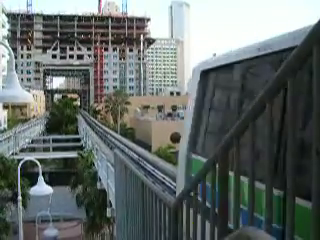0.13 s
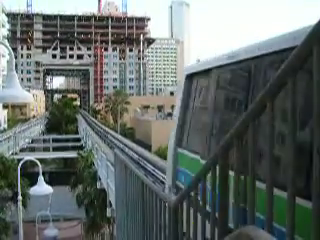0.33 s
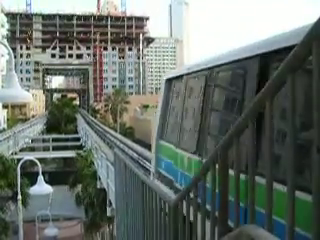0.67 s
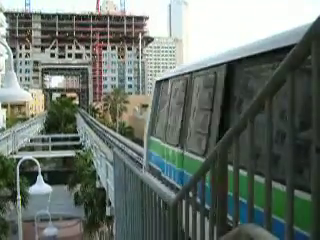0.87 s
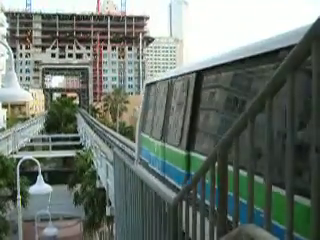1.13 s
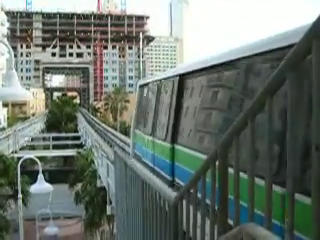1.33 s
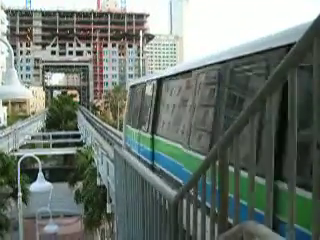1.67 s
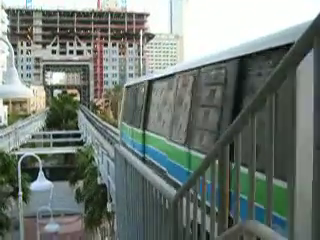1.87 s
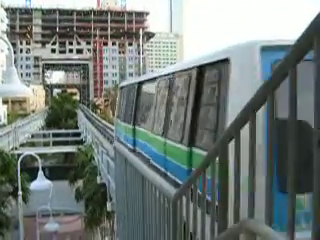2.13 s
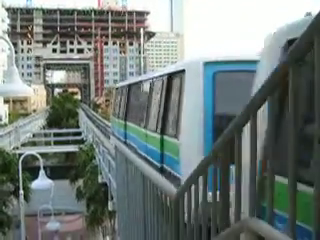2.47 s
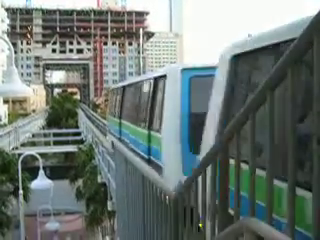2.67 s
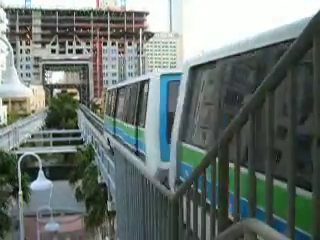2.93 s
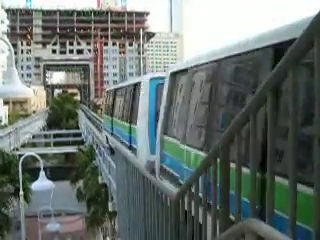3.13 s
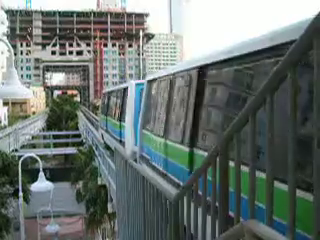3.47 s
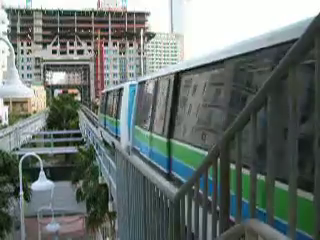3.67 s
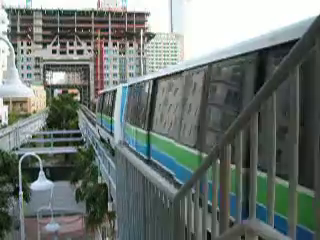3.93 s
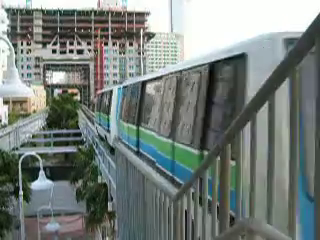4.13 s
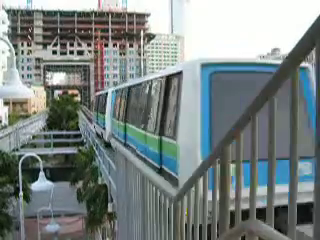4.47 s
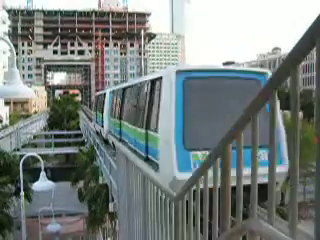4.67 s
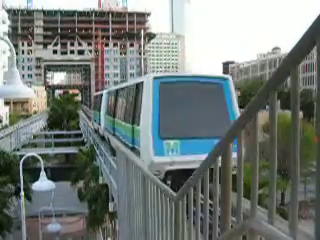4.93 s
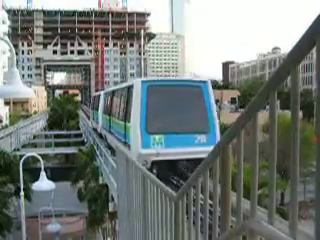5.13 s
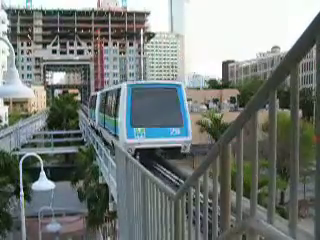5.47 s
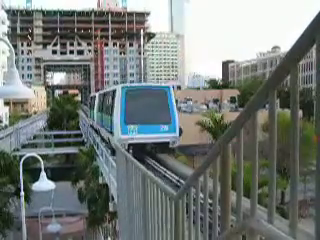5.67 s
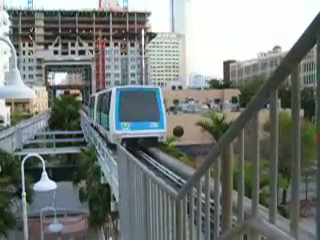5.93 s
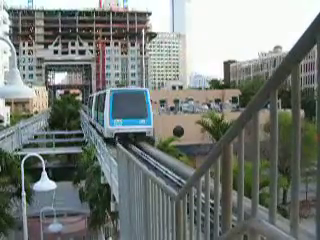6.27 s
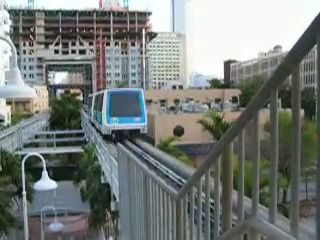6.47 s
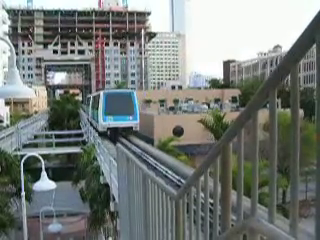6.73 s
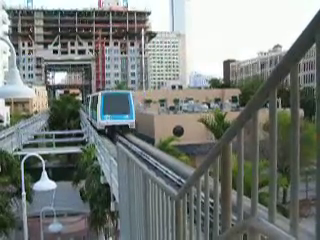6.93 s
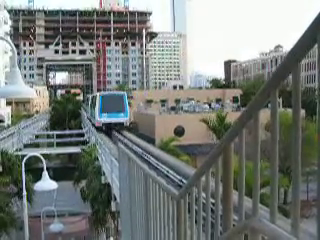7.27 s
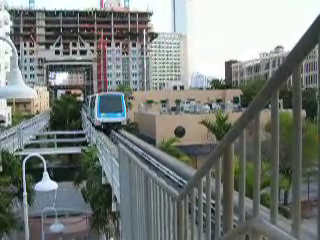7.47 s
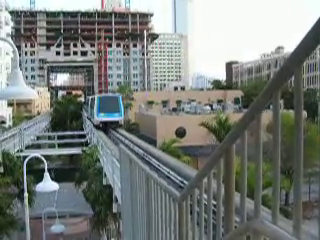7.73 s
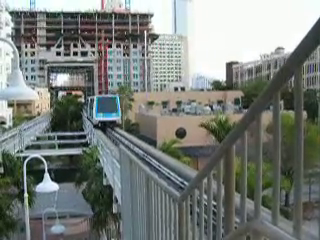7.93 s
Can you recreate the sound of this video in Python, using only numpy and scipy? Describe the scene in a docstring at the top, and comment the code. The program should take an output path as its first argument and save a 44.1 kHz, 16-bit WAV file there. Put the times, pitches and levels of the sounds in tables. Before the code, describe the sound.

Outdoors beside an elevated guideway, a rubber-tyred train accelerates past very close. Tyres roar unevenly on concrete while the drive whines upward over a swelling electrical hum. Thin metallic squeals come first, then the running gear clatters over joints with tiny squeaks. The sound is narrow, dull, mono and level-squashed, like a cheap small camera microphone, with a faint bright tick at the end.

```python
"""A rubber-tyred people mover accelerates past a platform and away along its elevated guideway.
From the start tyres roar on concrete, the drive whines upward over an electrical hum, and steady tones sing.
Collector shoes squeal early on; from 2.3 s the running gear clatters over joints amid short squeaks.
A faint bright tick comes near the end. Gain control holds the level down in a narrow band.
Sources are shaped noise, swept or steady lines with random flutter, and noise-driven rail resonances."""
import sys
import numpy as np
from scipy import signal
from scipy.fft import rfft, irfft
from scipy.io import wavfile
from scipy.ndimage import uniform_filter1d

SR = 44100
rng = np.random.default_rng(int(sys.argv[2]) if len(sys.argv) > 2 else 0)


def put_to_file(sound):
    """Save the sound as 16-bit audio at rate SR, in the file named by the first command-line argument."""
    columns = np.atleast_2d(sound).T  # one column per channel
    safe = np.clip(columns, -1, 1)
    whole_steps = np.round(safe * 32767)
    wavfile.write(sys.argv[1], SR, whole_steps.astype(np.int16))


N = 357342
T = np.arange(N) / SR

# hiss spectrum, shared by tyres and clacks: (frequency [Hz], relative density [dB])
HISS_SPECTRUM = [(600, -25), (1100, -2.5), (1700, -2), (2300, -6.5), (3000, -9), (3500, -13.5), (3900, -24),
                 (4300, -28.5)]


def amp(db):
    """Decibels to gain."""
    return 10 ** (np.asarray(db) / 20)


def unit(x):
    """Scales to rms 1."""
    return x / np.sqrt(np.mean(abs(x) ** 2) + 1e-20)


def curves(rows):
    """Interpolates each column of a table over the whole time; the first column is time [s]."""
    time_s, *columns = np.transpose(rows)
    return [np.interp(T, time_s, column) for column in columns]


def noise(points):
    """Gaussian noise of rms 1, its spectrum interpolated over log frequency."""
    point_hz, point_db = np.transpose(points)
    f_hz = np.fft.rfftfreq(N, 1 / SR)
    gain = amp(np.interp(np.log(f_hz + 1), np.log(point_hz), point_db))
    return unit(irfft(rfft(rng.standard_normal(N)) * gain, N))


def drift(rate_hz):
    """Slow random curve of rms 1, moving at up to about the given rate."""
    count, control_hz = 8192, 800
    f_hz = np.fft.rfftfreq(count, 1 / control_hz)
    lowpass = np.exp(-(f_hz / rate_hz) ** 2)
    slow = irfft(rfft(rng.standard_normal(count)) * lowpass)
    return unit(np.interp(T, np.arange(len(slow)) / control_hz, slow))


def tone(hz, rough, width_hz):
    """A line of rms 1; scattered reflections make its height and phase flutter."""
    flutter = 1 + rough * (drift(width_hz) + 1j * drift(width_hz))
    phase = 2 * np.pi * np.cumsum(hz * np.ones(N)) / SR
    return unit((flutter * np.exp(1j * phase)).real)


def band(x, hz, kind):
    """Zero-phase Butterworth low-pass or high-pass."""
    return signal.sosfiltfilt(signal.butter(3, hz, kind, fs=SR, output="sos"), x)


def swell(start_s, end_s, ramp_s=0.14):
    """A level that rises, holds and falls linearly."""
    return np.clip(np.minimum(T - start_s, end_s - T) / ramp_s, 0, 1)


def tyres(rumble_db=-30.5, hiss_db=1.5, split_hz=175, top_hz=1300, jolt_db=0.96, sway_db=.5,
          grit_db=0.06, near_db=-22.5, near_s=5.1, near_half_s=1.8):
    """Rumble, roar and hiss of the tread; the uneven concrete shakes roar and hiss together."""
    # rolling noise: (time [s], roar level [dB], hiss level before trim [dB])
    rolling_levels = [(.05, -19.5, -29.5), (.27, -11, -21), (.52, -18.5, -28.5), (1.15, -14, -22),
                      (1.6, -14.5, -23), (2.1, -15.5, -25.5), (2.55, -11.5, -20), (3.15, -15, -24.5),
                      (3.75, -15.5, -24), (4.25, -15.5, -25), (4.65, -14.5, -22), (5.15, -12.5, -21.5),
                      (5.55, -13.5, -23.5), (6.18, -15.5, -25), (6.5, -12.5, -23), (6.75, -14.5, -25.5),
                      (7.3, -18, -27.5), (7.53, -12, -24), (7.9, -18.5, -29)]
    # roar spectrum: (frequency [Hz], relative density [dB])
    roar_spectrum = [(25, -39), (50, -28), (85, -13), (125, -6.5), (190, 0), (260, 0), (400, 0),
                     (520, -4.5), (640, -6.5), (850, -8), (1060, -8.5), (1250, -12), (2500, -20.5),
                     (4300, -42)]
    roar_level_db, hiss_level_db = curves(rolling_levels)
    rolling = noise(roar_spectrum)
    jolts_db = jolt_db * drift(22) + sway_db * drift(6)
    deep = unit(band(rolling, split_hz, "lowpass"))
    deep = deep * amp(rumble_db + 2.2 * drift(6.1))
    body = band(band(rolling, split_hz, "highpass"), top_hz, "lowpass")
    body = unit(body) * amp(roar_level_db + jolts_db)
    tread = noise(HISS_SPECTRUM) * amp(hiss_level_db + hiss_db + jolts_db + grit_db * drift(60))
    # the middle range opens up while the cars are abreast
    abreast = noise([(300, -27), (520, -4.0), (800, -5.5), (1080, -4.0), (1500, -13.5), (4000, -42.5)])
    nearness = np.exp(-((T - near_s) / near_half_s) ** 2 / 2)
    return deep + body + tread + abreast * amp(near_db + jolts_db) * nearness


def drive(hum_hz=179, mains_hz=120.6, mains_db=-33):
    """Gear tones climb with the speed and flare at each body resonance; the electrical hum stays put."""
    # gear mesh rate as the train gathers speed: (time [s], rate [Hz])
    mesh_rate = [(0, 128), (1.3, 180), (3.05, 238), (3.35, 254), (5.2, 320), (5.7, 336), (6.5, 356),
                 (8.1, 403)]
    # drive tones: (multiple of mesh rate [-], loudest time [s], half length to 1/e [s],
    # level before body lift [dB], roughness [0-1])
    shafts = [(1, 4.6, 5.6, -26.5, .25), (2, 2.36, 2.2, -27.5, .6), (2, 5.8, 0.91, -36.5, .4),
              (1.575, 4.65, .6, -24.5, 0.3), (2.7, 4.6, 1.1, -35, .35), (3.15, 0.98, .28, -27.5, .45),
              (3.15, 3.7, 0.38, -31, .45), (3.5, 1.9, 0.18, -30.5, 0.5), (19.3, 0.91, 0.25, -46.5, .37),
              (14.5, 1.85, 0.31, -44, .37)]
    # body resonances: (centre [Hz], full width at half the dB lift [Hz], lift [dB])
    panels = [(179, 9, 6), (197.4, 6, 7), (209.6, 7.3, 7), (241, 23, 8.5), (291.3, 7.7, 7),
              (321.2, 21, 9.5), (359.4, 15, 6.5), (386, 7, 5), (414.6, 26, 6), (482, 42, 5), (508, 14, 8),
              (556, 13, 11.5), (668, 22, 13), (696, 11, 9.5), (798, 40, 9.5)]
    # traction hum: (time [s], level [dB])
    hum_levels = [(0, -22), (.78, -16.5), (1, -26), (1.38, -11.5), (1.65, -24), (2.35, -29), (3.4, -22),
                  (3.7, -32), (4.45, -25), (4.8, -35), (7.3, -42), (7.65, -19.5), (8.1, -50)]
    mesh_hz, = curves(mesh_rate)
    hum_level_db, = curves(hum_levels)
    out = amp(hum_level_db) * tone(hum_hz, rough=.12, width_hz=7)
    for multiple, loudest_s, half_s, db, rough in shafts:
        hz = multiple * mesh_hz
        lift_db = sum(lift * np.exp(-(2 * (hz - centre_hz) / width_hz) ** 2 * np.log(2))
                      for centre_hz, width_hz, lift in panels)
        passing = np.exp(-((T - loudest_s) / half_s) ** 2)
        out += amp(db + lift_db) * passing * tone(hz, rough, width_hz=14)
    return out + amp(mains_db) * tone(mains_hz, rough=.35, width_hz=7.7)


def singing_tones():
    """Single tones of fixed pitch swell and fade."""
    # (start [s], end [s], frequency [Hz], level [dB])
    tones = [(-.3, .7, 934, -37), (-.3, 1.6, 1044, -37), (-.1, .55, 256, -25), (6.65, 7.7, 997, -25.5),
             (7.45, 8.4, 1003, -34), (7.6, 8.4, 1046, -35), (7.45, 8.4, 1545, -35), (7.55, 8.4, 2735, -43),
             (7.45, 7.95, 215, -22), (7, 7.5, 455, -28), (7.85, 8.4, 402, -25)]
    return sum(amp(db) * swell(start_s, end_s) * tone(hz, rough=.22, width_hz=12)
               for start_s, end_s, hz, db in tones)


def shoe_squeal(rasp=0.28, waver_db=0.9, wander_hz=5):
    """Collector shoes squeal thinly on the power rail, with wandering pitch and a slight rasp."""
    # (start [s], end [s], mean frequency [Hz], mean level before rasp [dB])
    squeals = [(.55, 1.95, 2489, -33), (.62, 1.8, 2534, -33), (1.95, 2.65, 2489, -36),
               (2.55, 3.2, 2489, -32)]
    out = np.zeros(N)
    for start_s, end_s, mean_hz, db in squeals:
        level = amp(db + waver_db * drift(3.4)) * swell(start_s, end_s)
        out += level * tone(mean_hz + wander_hz * drift(12), rough=0.23, width_hz=26)
    return out * (1 + rasp * drift(55))


def clacks(level_db=-8.5, rise_s=0.0026, ring_db=-4.5, bright_db=-2.0, chatter_db=2.5, ring_db_per_s=0.5):
    """Each joint sets off a short dense chatter; later clacks drive the ringing rail harder."""
    # running gear over joints: (time [s], relative level [dB], treble relative to middle before trim [dB])
    joints = [(2.276, -12.5, -7), (3.269, -11, -11), (3.382, -12.5, -13), (3.550, -5, -16.5),
              (3.647, -10, -9), (3.812, -11.5, -13.5), (3.915, -11, -4.5), (4.092, -10.5, -16),
              (4.252, -12.5, -9.5), (4.349, -10, -12.5), (4.506, -9.5, -18.5), (4.597, -7, -6.5),
              (4.793, -13, -10), (4.868, -12.5, -11.5), (4.963, -10.5, -12), (5.043, -12.5, -10),
              (5.22, -11, -11.5), (5.301, -4.5, -16.5), (5.745, -8.5, -11.5), (5.792, -10, -5),
              (5.856, -11.5, -16.5), (6.020, -8.5, -9), (6.590, -11, -19), (6.866, -5, -16),
              (7.037, -7.5, -16), (7.135, -11.5, -10), (7.407, -6.5, -14)]
    # clack spectrum: (frequency [Hz], relative density [dB])
    clack_spectrum = [(400, -17), (1050, -5.5), (1400, 3.5), (1800, 6), (2300, -2), (3000, -8), (3600, -21),
                      (4300, -41)]
    # rail resonances: (frequency [Hz], relative level [dB], 60 dB decay time [s])
    rail_modes = [(1720, -11, 0.033), (1396, -22, 0.07), (2280, -13, 0.12), (2666, -11, 0.071),
                  (3510, -17, 0.13)]
    hold_s, fall_s, tail_db, tail_t60_s = .028, .012, -11, .3
    middle_power, treble_power = np.zeros((2, N))
    for start_s, db, treble_db in joints:
        age_s = np.maximum(T - start_s, 0)
        rattle = np.exp(-np.maximum(age_s - hold_s, 0) / fall_s)
        echo = amp(tail_db - 60 * np.minimum(age_s / tail_t60_s, 2))
        attack = np.minimum(age_s / rise_s, 1)
        power = (amp(db) * attack) ** 2 * (rattle ** 2 + echo ** 2)
        middle_power += power
        treble_power += power * amp(treble_db) ** 2
    # the chatter is too dense to hear as single impacts
    chatter = np.sqrt(middle_power) * noise(clack_spectrum)
    treble = unit(band(noise(HISS_SPECTRUM), 2700, "highpass"))
    chatter += amp(bright_db) * np.sqrt(treble_power) * treble
    chatter *= unit(amp(chatter_db * drift(340)))

    ring_s = T[:SR // 2]
    push = np.sqrt(middle_power) * amp(ring_db_per_s * T) * rng.standard_normal(N)
    rail = np.zeros(N)
    for hz, db, t60_s in rail_modes:
        ring = np.sin(2 * np.pi * hz * ring_s) * amp(-60 * ring_s / t60_s)
        rail += amp(db) * unit(signal.fftconvolve(push, ring)[:N])
    return amp(level_db) * (chatter + amp(ring_db) * chatter.std() * rail)


def squeaks(hz=3586, half_s=0.035):
    """One rough high note, sounding for an instant at a time."""
    # (time [s], level [dB])
    squeak_levels = [(2.30, -34), (2.461, -38), (3.95, -43), (7.05, -39), (7.15, -36)]
    level = sum(amp(db) * np.exp(-((T - peak_s) / half_s) ** 2) for peak_s, db in squeak_levels)
    return level * tone(hz, rough=0.5, width_hz=60)


def tick(start_s=8.0208, level_db=-16, decay_s=.00005):
    """A single sharp exponential spike that reaches high into the treble."""
    age_s = T - start_s
    return amp(level_db) * (age_s >= 0) * np.exp(-abs(age_s) / decay_s)


def scene():
    """Tyres, drive, tones, squeals, clacks and squeaks of the passing train, in mono."""
    return (tyres() + drive() + singing_tones() + shoe_squeal() + clacks() + squeaks())[None]


def lowpass_fir(x, taps, hz):
    """Linear-phase low-pass, without delay."""
    return signal.oaconvolve(x, signal.firwin(taps, hz, window=("kaiser", 9), fs=SR), "same")


def record(dry, threshold_db=-6.0, recovery_db_per_s=57.0, gain_db=1.0, ceiling=.7):
    """Gain control ducks at peaks and recovers; a narrow band and clipping precede the wide-band tick."""
    voice_band_hz, edge_hz = 4200, 15900
    x = amp(gain_db) * dry[0]
    over_db = np.maximum(20 * np.log10(abs(x) + 1e-9) - threshold_db, 0)
    # peak hold of the excess, falling at the recovery rate
    recovered_db = recovery_db_per_s * T
    held_db = np.maximum.accumulate(over_db + recovered_db) - recovered_db
    x = x * amp(-.6 * uniform_filter1d(held_db, size=90))
    x = lowpass_fir(x, 301, voice_band_hz)
    x = np.clip(x, -ceiling, ceiling) + tick()
    return lowpass_fir(x, 511, edge_hz)[None]


dry = scene()
out = record(dry)
put_to_file(out)
```